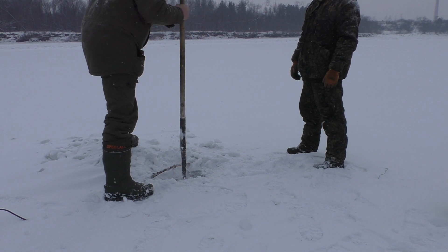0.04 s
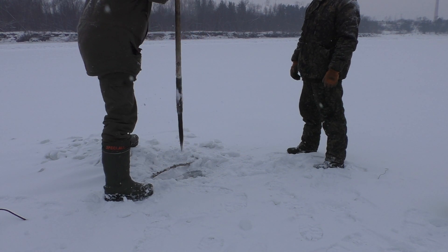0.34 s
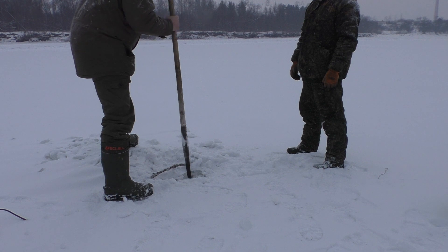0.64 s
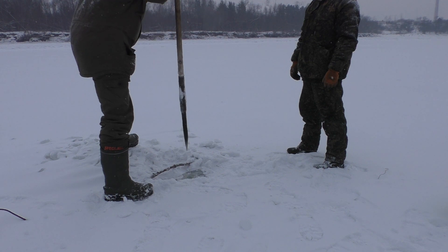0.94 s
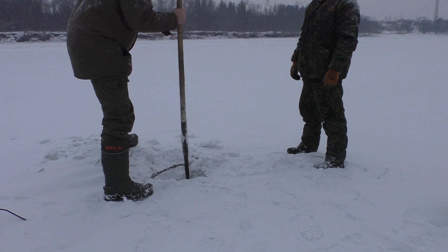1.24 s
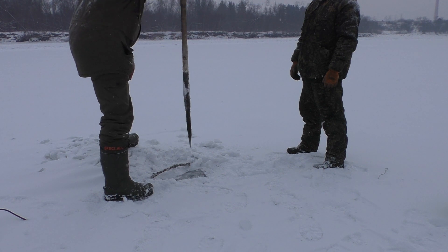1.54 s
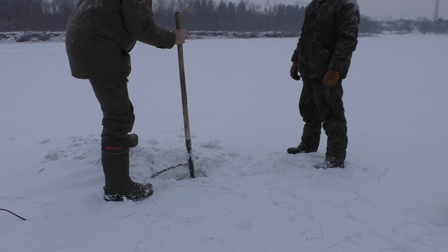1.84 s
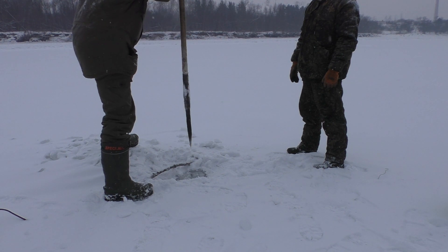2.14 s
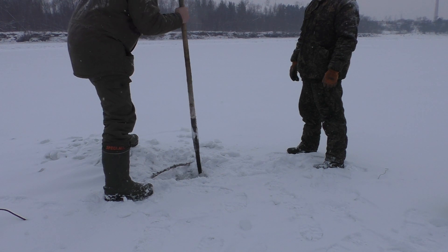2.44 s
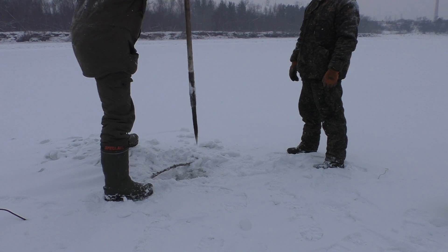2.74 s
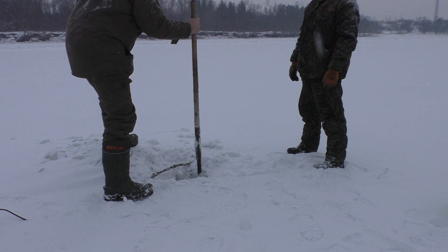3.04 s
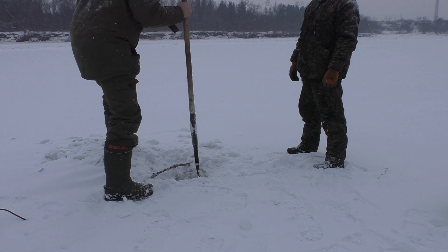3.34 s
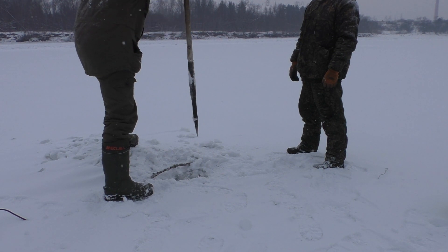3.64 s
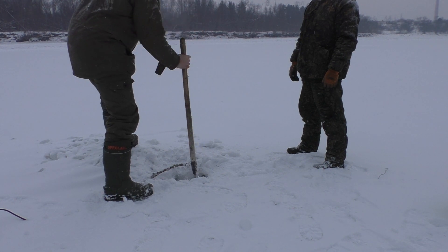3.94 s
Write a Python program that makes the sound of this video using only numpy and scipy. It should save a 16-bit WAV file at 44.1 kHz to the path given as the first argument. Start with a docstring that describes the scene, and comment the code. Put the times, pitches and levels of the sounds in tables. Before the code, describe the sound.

A long steel chisel chops into thick ice a few metres away, seven evenly paced blows. Each cracks, thumps and crunches into wet chips, with small splinters ticking down. Light wind murmurs over the open frozen lake.

```python
"""Seven sharp, crunching blows: a long steel chisel is driven into thick lake ice a few metres away.
Each blow cracks, rings briefly, thumps the ice sheet and crushes on into wet chips.
Splinters tick down, bubbles ping in the hole, and packed snow creaks under a boot.
Light wind murmurs over the open lake, and near the end a faint tone comes from far away."""
import sys
import numpy as np
from scipy import signal
from scipy.fft import rfft, irfft
from scipy.io import wavfile
from scipy.ndimage import uniform_filter1d

SR = 44100
rng = np.random.default_rng(int(sys.argv[2]) if len(sys.argv) > 2 else 0)


def pcm_store(signal):
    """Save signal as 16-bit PCM."""
    levels = np.round(np.clip(np.atleast_2d(signal), -1, 1) * 32767)
    wavfile.write(sys.argv[1], SR, levels.astype(np.int16).T)


N = 176400

# Tone colour of ice being crushed: (frequency [Hz], level [dB])
CRUSH_COLOUR = [(60, -27.5), (200, -11.5), (430, -11.5), (750, -15), (1080, -4.5), (1700, -1), (2700, 0.5),
                (4200, -4), (5600, -13), (7500, -15.5), (11000, -11), (13000, -22.5), (16000, -25.5)]
# Tone colour of the bright tick of a small piece of ice: (frequency [Hz], level [dB])
TICK_COLOUR = [(1000, -48), (3500, -14.5), (6000, -6), (8000, 3), (11500, 8.5), (16000, 3)]
CRACK_CLICKS_PER_S, CRUSH_CLICKS_PER_S = 7600, 2200
EVENT_TIME = np.arange(2 ** 13) / SR  # seconds since the start of one short sound


def amp(db):
    """Turns decibels into a factor to multiply by."""
    return 10 ** (np.asarray(db) / 20)


def unit(x):
    """Scales a signal to an average power of 1."""
    return x / np.sqrt(np.mean(x ** 2) + 1e-20)


def read(points, hz):
    """Reads between the rows of a table, on a logarithmic frequency scale."""
    row_hz, value = np.transpose(points)
    return np.interp(np.log(hz + 1), np.log(row_hz + 1), value)


def add(mix, start_s, sound):
    """Mixes a sound in at the given time."""
    part = mix[max(round(start_s * SR), 0):][:len(sound)]
    part += sound[:len(part)]


def fade(t, t60):
    """Full level until t = 0, then 60 dB quieter every t60 seconds."""
    return amp(-60 * np.maximum(t, 0) / t60)


def rise(t, rise_s):
    """Climbs from silence at t = 0 to full level at rise_s."""
    return np.clip(t / rise_s, 0, 1)


def drift(count, smooth_over):
    """Random values, smoothed so that they wander up and down."""
    return unit(uniform_filter1d(rng.standard_normal(count), smooth_over))


def colour(x, points, bass_db=0, treble_db=0):
    """Gives a sound the tone colour in a table, then turns its bass and treble up or down."""
    hz = abs(np.fft.fftfreq(2048, 1 / SR))
    bass = 1 / (1 + (hz / 648) ** 4)
    treble = 1 - 1 / (1 + (hz / 6000) ** 4)
    gain = unit(amp(read(points, hz))) * amp(bass_db * bass + treble_db * treble)
    # This kind of filter (minimum phase) makes no sound ahead of a click.
    response = np.exp(np.conj(signal.hilbert(np.log(gain + 1e-6))))
    return signal.fftconvolve(x, np.fft.ifft(response).real)[:len(x)]


def fractures(per_s, spread_db, even_s):
    """Tiny breaks in the ice: random clicks whose loudness is evened out over even_s seconds."""
    n = len(EVENT_TIME)
    clicks = (rng.random(n) < per_s / SR) * rng.choice([-1., 1.], n)
    clicks *= amp(spread_db * np.minimum(rng.exponential(1, n), 4))
    power = abs(uniform_filter1d(clicks ** 2, int(even_s * SR)))
    return clicks / np.sqrt(power + 0.0013)


def bend(x):
    """Low notes travel slowly as bending waves in the ice, so the bass arrives late."""
    hz = np.fft.rfftfreq(2 * len(x), 1 / SR)
    delay_s = 0.00603 / (1 + (hz / 650.7) ** 4)
    lag_cycles = np.cumsum(delay_s) * hz[1]
    return irfft(rfft(x, 2 * len(x)) * np.exp(-2j * np.pi * lag_cycles))[:len(x)]


def wind(level_db=-53.5, patch_db=0.6, swell_db=0.9):
    """Low wind and distant hiss, with drifting patches and a slow swell."""
    # Tone colour of the wind: (frequency [Hz], level [dB])
    wind_colour = [(20, -51), (40, -29), (65, 2.5), (110, -1.5), (170, 2), (240, -10), (410, -6.5),
                   (540, -17.5), (680, -22), (850, -24), (1200, -15), (1700, -17.5), (2400, -20),
                   (3400, -24.5), (5900, -34), (8000, -33), (10800, -28), (16000, -33.5)]
    # How alike the wind is in the two ears: (frequency [Hz], likeness [0 to 1])
    ear_likeness = [(60, 0.75), (150, 0.76), (380, 0.84), (950, 0.79), (2380, 0.31), (5980, 0.9),
                    (15000, 0.65)]
    # Which side the wind leans to: (frequency [Hz], left minus right [dB])
    wind_balance = [(60, 4), (240, -1.5), (950, -0.5), (3770, 0.5), (15000, 0)]
    size, hop = 1024, 256  # the noise is built from short overlapping frames
    frames, hz = N // hop + 5, np.fft.rfftfreq(size, 1 / SR)
    a, b, c, d, patches = rng.standard_normal((frames, len(hz), 5)).T
    left, unrelated = a + 1j * b, c + 1j * d
    patches = unit(uniform_filter1d(uniform_filter1d(patches, size=10, axis=0), size=14, axis=1))
    swell = drift(frames, smooth_over=50)
    same = read(ear_likeness, hz)[:, None]
    right = same * left + np.sqrt(1 - same ** 2) * unrelated
    lean = amp(read(wind_balance, hz) / 2)[:, None]
    spectrum = np.array([left * lean, right / lean])
    spectrum *= amp(read(wind_colour, hz)[:, None] + patch_db * patches - swell_db * swell)
    noise = signal.istft(spectrum, nperseg=size, noverlap=size - hop)[1][:, :N]
    return amp(level_db) * unit(noise)


def far_tone(start_s=3.48, length_s=0.41, hz=778, level_db=-65.5):
    """A faint, slightly wavering tone from far across the lake."""
    progress = np.clip((np.arange(N) / SR - start_s) / length_s, 0, 1)
    swell = np.sqrt(abs(np.sin(np.pi * progress)))
    wavering_hz = hz * (1 + .011 * drift(N, smooth_over=1500))
    return amp(level_db) * swell * np.sin(2 * np.pi * np.cumsum(wavering_hz) / SR)


def crumbs(per_s=8):
    """Stray crumbs of ice land at random moments, each a tiny dry tick."""
    t, out = EVENT_TIME, np.zeros(N)
    for when, chance in rng.random((round(per_s * N / SR), 2)):
        db = -62 - 2.5 * np.log(chance + .02)  # most are faint, a few are louder
        add(out, when * N / SR, amp(db) * rng.standard_normal(len(t)) * fade(t, t60=.014))
    return colour(out, TICK_COLOUR)


def snow_creaks(end_hz=283, fall_s=0.00084):
    """Snow slips under a boot: each slip is a click that falls quickly in pitch."""
    # Slips of packed snow: (time [s], level [dB], starting pitch [Hz])
    slips = [(.189, -39, 1930), (.219, -37.5, 1910), (.4025, -38, 1310), (.4575, -40.5, 2570),
             (.4635, -39.5, 1680), (.497, -37.5, 2460), (.533, -36.5, 1800), (.5525, -36.5, 2150),
             (1.566, -34, 442), (3.369, -38.5, 2030), (3.409, -36, 2160)]
    t, out = EVENT_TIME, np.zeros(N)
    for start_s, db, start_hz in slips:
        hz = end_hz + (start_hz - end_hz) * np.exp(-t / fall_s)
        add(out, start_s, amp(db) * np.sin(2 * np.pi * np.cumsum(hz) / SR) * fade(t, t60=0.018))
    return out


def bubbles(climb_per_s=7.5):
    """Bubbles and wet chips ping in the hole: each is a short ring that rises in pitch."""
    # Pings in the hole: (time [s], starting pitch [Hz], level [dB])
    pings = [(.106, 2290, -40), (.69, 1810, -26), (.747, 2720, -28.5), (.752, 3320, -26.5),
             (.767, 2590, -40), (.805, 1160, -44.5), (.814, 1602, -55), (1.273, 2010, -33),
             (1.32, 2646, -41.5), (1.868, 2600, -31), (1.882, 1115, -33), (1.891, 1130, -32.5),
             (1.911, 1410, -33), (1.975, 1020, -35.5), (2.008, 1110, -33.5), (2.04, 2180, -42),
             (3.604, 2110, -44.5)]
    t, out = EVENT_TIME, np.zeros(N)
    for start_s, hz, db in pings:
        tone = np.sin(2 * np.pi * hz * (t + climb_per_s * t ** 2 / 2))
        add(out, start_s, amp(db) * tone * rise(t, 0.00034) * fade(t, t60=0.027))
    return out


def splinters():
    """Single splinters break off or land, each with a snap and a brief rattle."""
    # Snaps of splinters: (time [s], body level [dB], treble level [dB])
    snaps = [(.088, -46, -58), (.108, -32.5, -37), (.269, -68, -44.5), (.274, -65, -47), (.4965, -40, -49),
             (.503, -41, -53), (.815, -45.5, -49), (1.0255, -52, -44), (1.109, -60.5, -52.5),
             (1.235, -24, -39), (1.253, -29, -38.5), (1.273, -28, -35.5), (1.368, -44.5, -52),
             (1.475, -64, -46.5), (1.825, -14, -30.5), (1.858, -33, -42), (2.083, -50, -41),
             (2.527, -32, -36), (2.535, -29.5, -36), (2.882, -64, -40), (3.183, -27, -33.5),
             (3.27, -36, -42), (3.303, -41, -42), (3.325, -23, -22), (3.331, -18.5, -24.5),
             (3.369, -50, -62), (3.409, -49, -64), (3.606, -56, -53), (3.717, -53, -40.5)]
    # Tone colour of the body of a snap: (frequency [Hz], level [dB])
    body_colour = [(100, -25.5), (700, -14.5), (1300, 1), (2300, 6), (3600, -1), (6000, -9.5),
                   (9000, -26.5), (16000, -63.5)]
    t, out = EVENT_TIME, np.zeros(N)
    snap_and_rattle = fade(t, t60=0.01) + amp(-19) * fade(t, t60=0.045)
    for start_s, body_db, treble_db in snaps:
        snap = snap_and_rattle * fractures(CRACK_CLICKS_PER_S, spread_db=-4, even_s=0.001)
        add(out, start_s, amp(body_db) * colour(snap, body_colour))
        add(out, start_s, amp(treble_db) * colour(snap, TICK_COLOUR))
    return out


def shards(level, count=40, low_hz=951, top_hz=12800, ring_cycles=50):
    """Broken pieces ping briefly, each at its own pitch, as strongly as the crushing that frees them."""
    # How strongly the pieces ring: (pitch [Hz], level [dB])
    shard_colour = [(900, -9), (1300, -0.5), (2700, 2.5), (4200, -3.5), (5600, -8), (7500, -12.5),
                    (11000, -7.5), (13000, -10.5)]
    clicks = level * fractures(per_s=960, spread_db=4, even_s=0.028)
    piece_hit = rng.integers(0, count, len(clicks))
    pitches = np.geomspace(low_hz, top_hz, count) * rng.uniform(1.0, 1.03, count)
    out = 0
    for piece, hz in enumerate(pitches):
        kept = fade(1 / SR, t60=ring_cycles / hz)  # share of the ring left after one sample
        turn = 2 * np.pi * hz / SR
        hits = clicks * (piece_hit == piece) + 1e-18
        ping = signal.lfilter([np.sin(turn)], [1, -2 * kept * np.cos(turn), kept ** 2], hits)
        out += amp(read(shard_colour, hz)) * np.sqrt(2 * (1 - kept ** 2)) * ping
    return out


def crunches():
    """The blade grinds on or is pulled free, making clumps of tiny breaks and pinging shards."""
    # Moves of the blade through broken ice: (time [s], length [s], relative start level [dB],
    # relative end level [dB], bass boost [dB], treble boost [dB])
    moves = [(.598, 0.062, -28, -32, -1.5, 4.5), (.655, 0.025, -41.5, -39, 19, -14),
             (.69, 0.057, -49, -43, 14, 0), (.745, 0.018, -39.5, -45, -25, 1),
             (.765, .055, -51, -68, 3, 13), (1.2, 0.059, -36, -34, 13, -1),
             (1.29, 0.054, -61, -55, -14, -12), (1.802, 0.029, -22, -28.5, 5, 7),
             (1.835, 0.14, -37.5, -57.5, 11.5, -2.5), (1.94, 0.11, -46, -45.5, 20, 2.5),
             (2.06, 0.086, -54.5, -67, -5, 12), (2.55, 0.057, -61.5, -54.5, -1, 6),
             (3.102, 0.013, -15.5, -28.5, 12, 2.5), (3.115, 0.013, -26.5, -31, 22.5, 1),
             (3.24, 0.093, -54, -34.5, -20, 5), (3.34, 0.16, -49.5, -57.5, 9, -7),
             (3.56, 0.044, -56, -51.5, 11, 1), (3.955, 0.025, -31, -35, -16, 0),
             (3.987, 0.019, -21.5, -25.5, -26, -18)]
    t, out = EVENT_TIME, np.zeros(N)
    for start_s, length_s, start_db, end_db, bass_db, treble_db in moves:
        clumps_db = 0.5 * drift(len(t), smooth_over=int(.004 * SR))
        level = amp(np.interp(t, [0, length_s], [start_db, end_db]) + clumps_db)
        level *= rise(t, 0.0038) * fade(t - length_s, t60=0.042)
        per_s = CRUSH_CLICKS_PER_S * amp(.3 * (start_db + 26))  # gentler crunches have fewer clicks
        clicks = level * fractures(per_s, spread_db=2.5, even_s=0.014)
        grit = bend(colour(clicks, CRUSH_COLOUR, bass_db, treble_db))
        add(out, start_s, amp(-4) * grit + amp(-1) * shards(level))
    return out


def ringing(notes):
    """Adds up steady tones, given as (pitch [Hz], level [dB]), each starting anywhere in its cycle."""
    return sum(amp(db) * np.sin(2 * np.pi * (hz * EVENT_TIME + rng.random())) for hz, db in notes)


def sheet_thumps(linger_hz=225.6):
    """The ice sheet gives under the blade: two low notes swell and die, and a weak one lingers."""
    # Thumps of the ice sheet: (time [s], rise time [s], low pitch [Hz], its level [dB],
    # high pitch [Hz], its level [dB], lingering level [dB])
    thumps = [(.047, 0.017, 288, -31.5, 432, -39, -41), (.585, 0.0061, 245, -32, 450, -26.5, -50),
              (1.185, 0.0062, 205, -26.5, 421.7, -26, -33), (1.792, 0.0075, 250.7, -26.5, 428, -25, -33.5),
              (2.476, 0.0086, 194, -28, 425, -27.5, -40), (3.094, 0.0055, 209, -31.5, 358, -30.5, -32.5),
              (3.127, 0.0082, 133, -29.5, 330, -37, -55), (3.936, 0.0066, 226, -27.5, 447, -22, -32.5)]
    t, out = EVENT_TIME, np.zeros(N)
    for start_s, rise_s, low_hz, low_db, high_hz, high_db, linger_db in thumps:
        swell = (t / rise_s * np.exp(1 - t / rise_s)) ** 3.7
        notes = ringing([(low_hz, low_db), (high_hz, high_db)])
        linger = amp(linger_db) * np.sin(2 * np.pi * linger_hz * t)
        linger *= rise(t - rise_s, rise_s) * fade(t - rise_s, t60=0.25)
        add(out, start_s, swell * notes + linger)
    return out


def chisel_blows(touch_s=.004, touch_db=-16.5, crush_rise_s=0.0016):
    """The tip touches loose chips, the solid ice cracks, blade and ice ring, and the crushing fades."""
    # Blows of the chisel: (time [s], crack level [dB], crush level before its bass boost [dB],
    # crush fade time [s], then for each of three rings: pitch [Hz], level [dB])
    blows = [(0.0469, -12.5, -20, 0.08, 1430, -34, 2116, -12, 2976, -17.5),
             (0.5815, -13.5, -27, 0.2, 2200, -20.5, 2390, -12.5, 4060, -23),
             (1.1801, -14.5, -20, 0.15, 1173, -17.5, 1460, -15.5, 4080, -16),
             (1.7901, -13, -20.5, 0.16, 1510, -16.5, 2248, -20.5, 2910, -19),
             (2.4774, -17, -18.5, 0.077, 1460, -13, 2280, -12, 4320, -12),
             (3.0916, -22, -25.5, 0.072, 1520, -16, 2970, -25, 3700, -36),
             (3.9341, -13, -23, 0.16, 1493, -13, 2490, -20, 4215, -15)]
    # Tone colour of cracking ice: (frequency [Hz], level [dB])
    crack_colour = [(60, -35), (200, -17), (450, -11.5), (780, -9), (1100, -3), (1600, -5), (2400, -2.5),
                    (4200, -0.5), (5600, -7.5), (7500, -16.5), (11000, -12.5), (13000, -17.5), (16000, -20)]
    t, out = EVENT_TIME - touch_s, np.zeros(N)  # the tip meets solid ice at t = 0
    crack_shape = np.interp(t, [-touch_s, 0, 0.00035], [0, amp(touch_db), 1])
    crack_shape *= fade(t - 0.00081, t60=0.015)
    for start_s, crack_db, crush_db, crush_t60, *rings in blows:
        clicks = crack_shape * fractures(CRACK_CLICKS_PER_S, spread_db=1.5, even_s=0.00067)
        crack = amp(crack_db) * colour(clicks, crack_colour)
        crush_shape = rise(t, crush_rise_s) * fade(t - crush_rise_s, crush_t60)
        grains = crush_shape * fractures(CRUSH_CLICKS_PER_S, spread_db=2.5, even_s=0.036)
        crush = amp(crush_db) * bend(colour(grains, CRUSH_COLOUR, bass_db=10))
        ring = ringing(zip(rings[::2], rings[1::2])) * rise(t, 0.000856) * fade(t, t60=0.029)
        add(out, start_s - touch_s, crack + crush + ring)
    return out


def open_lake(x):
    """Carries a sound to both ears: directly, scattered off the snow and as a faint far echo."""
    # Scatter off the snow, opposite in the two ears: (frequency [Hz], level [dB])
    scatter_colour = [(100, -16), (500, -18), (1000, -20.5), (2200, -23), (4000, -24), (8000, -19.5),
                      (14000, -16)]
    # Tone colour of the far echo: (frequency [Hz], relative level [dB])
    echo_colour = [(100, 16), (1500, 1), (4000, -8.5), (8000, -12), (16000, -19)]
    # Which side the direct sound leans to: (frequency [Hz], left minus right [dB])
    direct_balance = [(100, 0), (250, -2.1), (500, -1.7), (1200, .5), (2500, .6), (5000, .2), (11000, .8)]
    t, hz = np.arange(SR) / SR, np.fft.rfftfreq(2 * N, 1 / SR)
    near = rng.standard_normal(SR) * rise(t, .003) * fade(t, t60=.03)
    far = rng.standard_normal(SR) * rise(t, 0.036) * fade(t, t60=0.37)
    scatter = rfft(near / np.linalg.norm(near), 2 * N) * amp(read(scatter_colour, hz))
    echo = rfft(far / np.linalg.norm(far), 2 * N) * amp(read(echo_colour, hz) - 34)
    lean = amp(read(direct_balance, hz) / 2)
    ears = np.array([lean + scatter + echo, 1 / lean - scatter + echo])
    return irfft(rfft(x, 2 * N) * ears)[:, :N]


def scene():
    """All the work at the hole, heard across the snow, over the wind and the far tone."""
    work = chisel_blows() + sheet_thumps() + crunches() + splinters()
    work += snow_creaks() + bubbles() + crumbs()
    return open_lake(work) + wind() + far_tone()


def record(dry):
    """Cuts off the very highest treble."""
    low_pass = signal.firwin(511, cutoff=16200, window=("kaiser", 9), fs=SR)
    return signal.oaconvolve(dry, low_pass[None], "same")


dry = scene()
out = record(dry)
pcm_store(out)
```